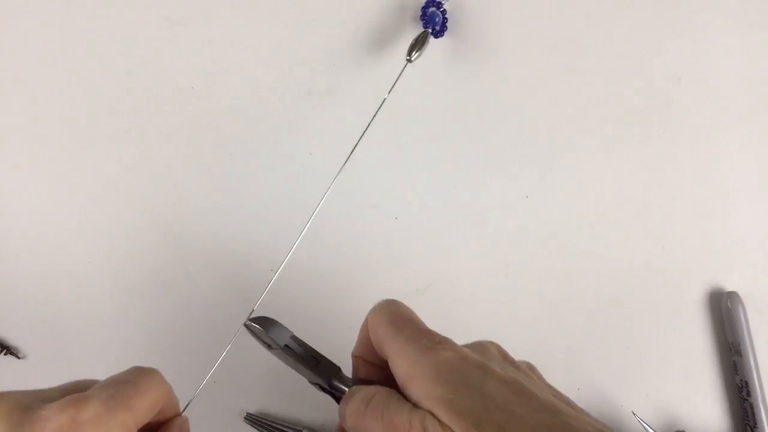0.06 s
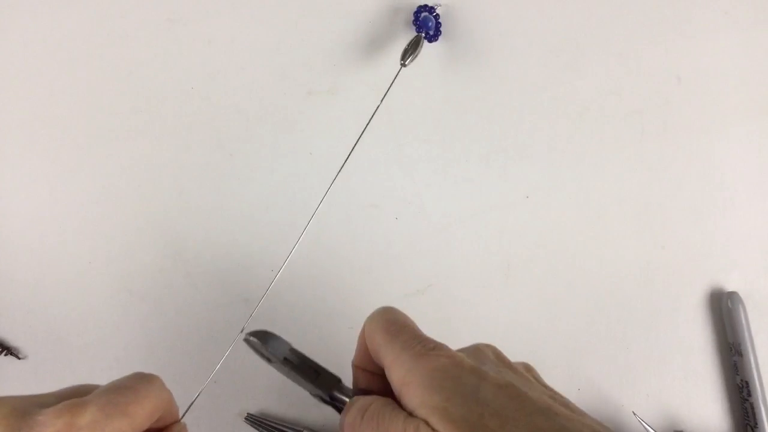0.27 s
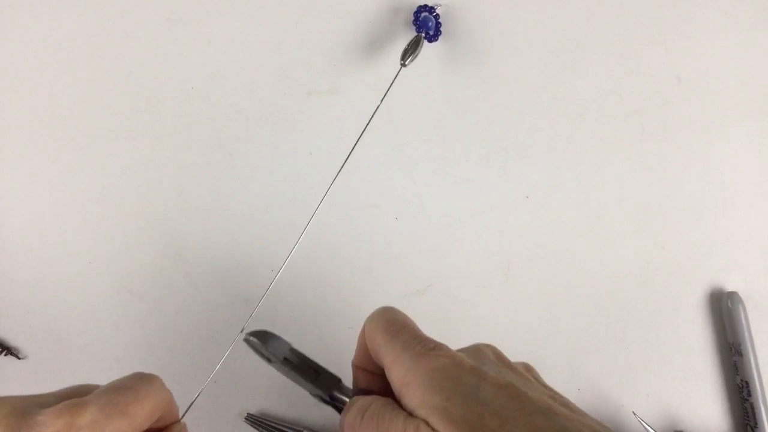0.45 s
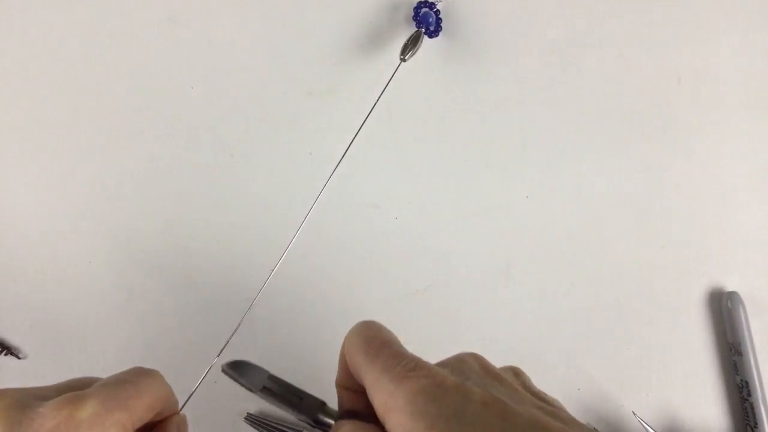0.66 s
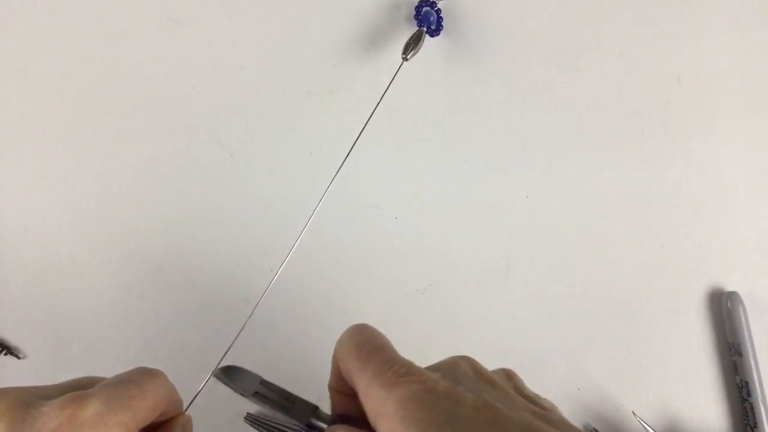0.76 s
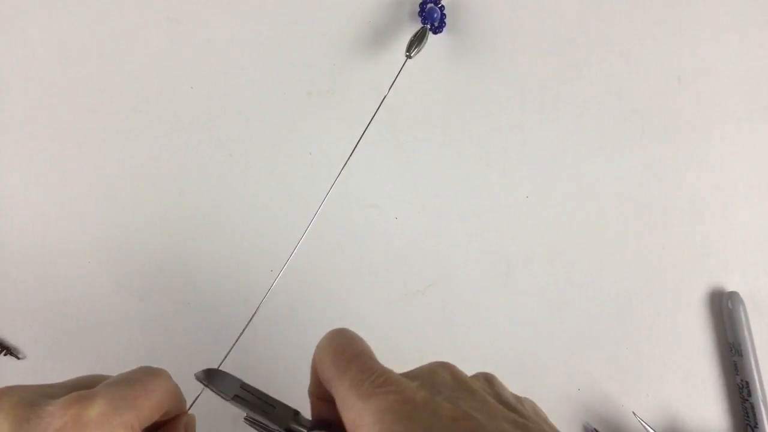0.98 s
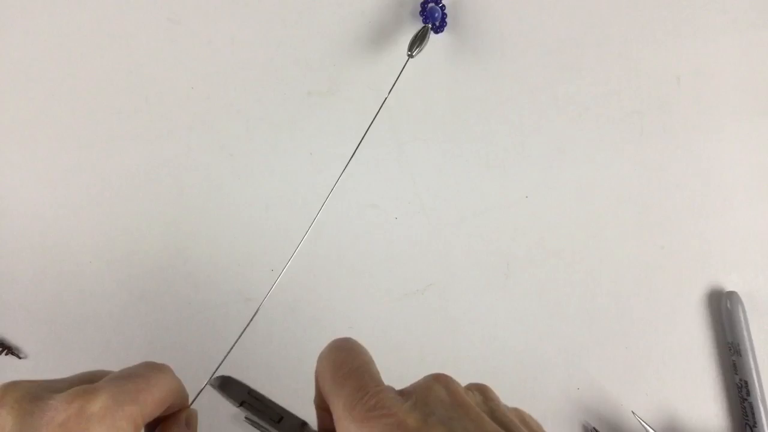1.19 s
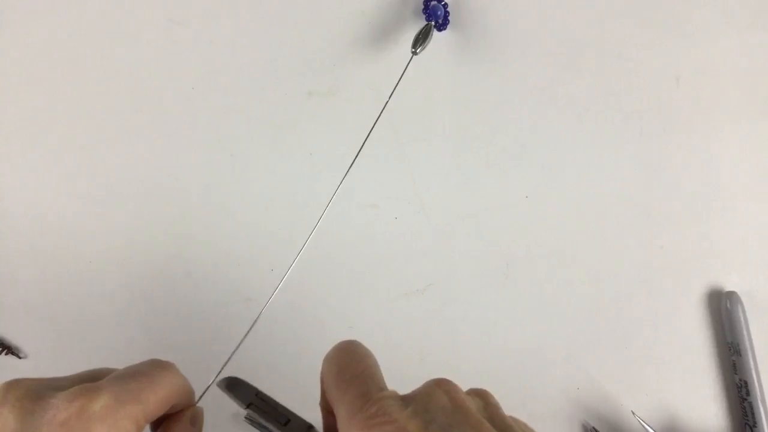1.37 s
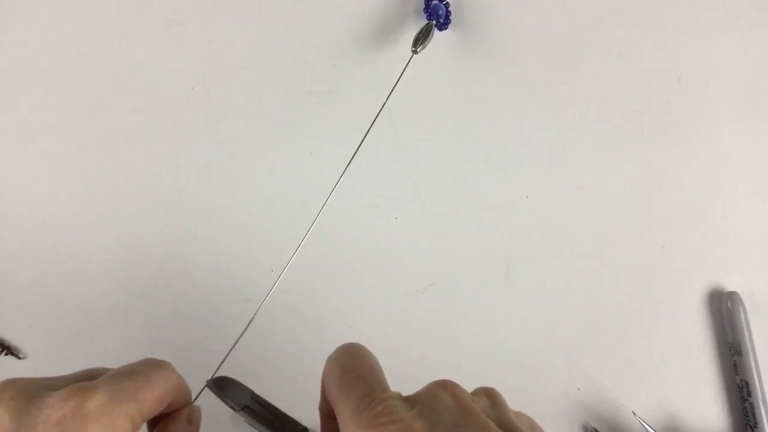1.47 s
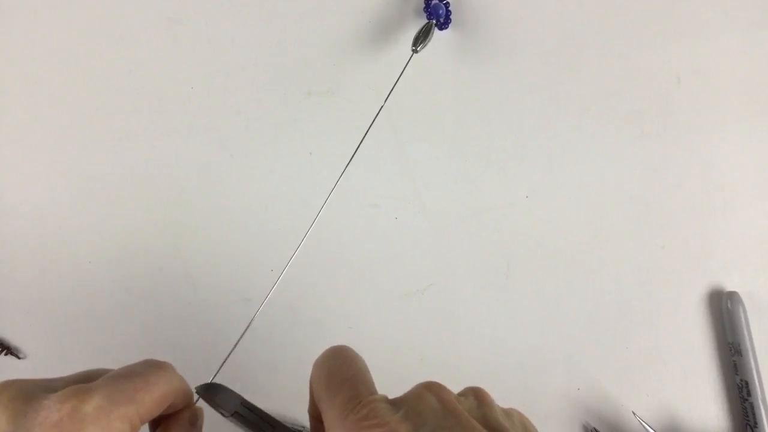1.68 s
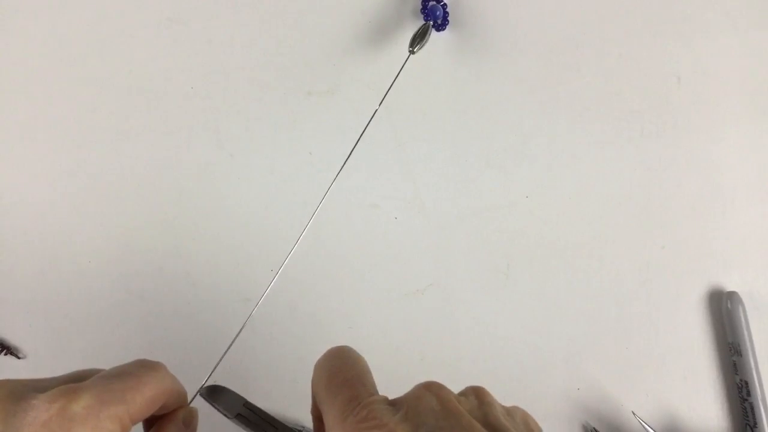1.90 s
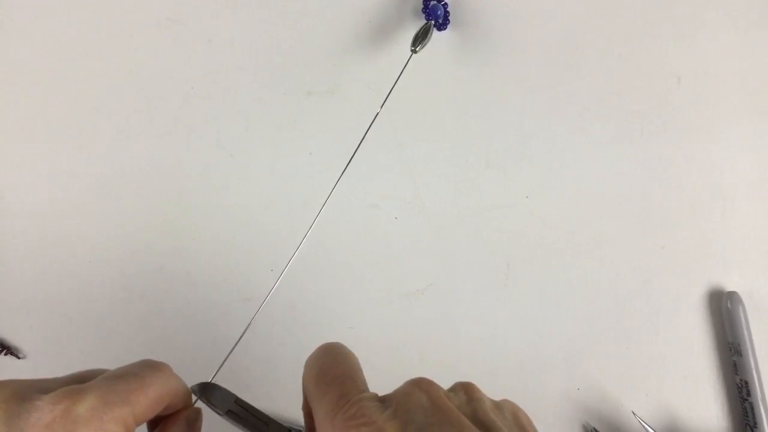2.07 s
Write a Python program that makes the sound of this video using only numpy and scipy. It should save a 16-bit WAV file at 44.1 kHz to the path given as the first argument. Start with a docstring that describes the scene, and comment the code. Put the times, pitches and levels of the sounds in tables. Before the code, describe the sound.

One hard, dry metallic snip of hand cutters on taut thin wire, heard close up indoors. Before it, soft hand rubbing, tiny touches and ticks; after it, a quick echo, rattling steel and a thin high scrape.

```python
"""A low ventilation hum and a soft rub of hands, then faint knocks with thin pings as jaws find a wire.
Wire cutters tick, snip once through thin craft wire, close above a table in a quiet room; an echo
returns, cutters and loose wire clatter and the wire scrapes along the steel to the end. Hum: filtered
noise. Rub and scrape: dense random slips through filters. Knocks, ticks and that echo: filtered impulse
plus chatter. Pings and jaw ring: decaying sines. Room: near echoes and a decaying noise tail."""
import sys
import numpy as np
from scipy import signal
from scipy.fft import rfft, irfft
from scipy.io import wavfile
from scipy.ndimage import uniform_filter1d

SR = 44100
rng = np.random.default_rng(int(sys.argv[2]) if len(sys.argv) > 2 else 0)


def bounce(signal):
    """Save signal as a 16-bit WAV file at the path given by the first command-line argument."""
    frames = np.transpose(np.atleast_2d(signal))
    limited = np.clip(frames, -1, 1)
    pcm = np.round(limited * 32767).astype(np.int16)
    wavfile.write(sys.argv[1], SR, pcm)


N = 94374

# ventilation hum spectrum: f/Hz, relative density/dB
HUM_SPECTRUM = [(20, -18.5), (50, -34.5), (100, -28.5), (125, -16.5), (155, -2.5), (200, -4.5), (250, 5),
                (300, -4.5), (370, -12), (480, -22.5), (800, -25.5), (1100, -30.5), (1450, -25),
                (1800, -49), (2400, -57), (4000, -61), (16000, -69)]
HUM_RMS_DB, HUM_DRIFT_STD_DB = -52, 3.5

# hands rubbing on tool and wire: t/s, level/dB
RUB_LEVEL = [(0, -62), (.15, -61.5), (0.398, -67.5), (.7, -79), (1.3, -72.5), (1.42, -75.5), (1.548, -72.5),
             (1.798, -81.5), (1.919, -62), (2.0, -58), (2.14, -59.5)]
# colour of the rub: f/Hz, relative level/dB
RUB_SPECTRUM = [(60, -28), (250, 4.5), (420, 13), (700, 1.5), (1200, -2), (1600, -6), (2200, -40),
                (4000, -63), (16000, -32)]

# jaws touch the taut wire, ping pitch set by where it is touched:
# t/s, knock level/dB, knock length/s, ping f/Hz, ping level/dB, ping t60/s
WIRE_TOUCHES = [(0.348, -40, 0.0055, 11700, -40.5, 0.00071), (0.82, -34, 0.013, 5110, -47.5, 0.0057),
                (0.9, -41, 0.012, 1820, -56, .01), (1.078, -32.5, 0.007, 3890, -46, 0.011),
                (1.094, -34, 0.006, 4110, -43.5, 0.028), (1.138, -32.5, 0.014, 3970, -48.5, 0.016),
                (1.143, -72, 0.011, 15100, -53, 0.0019), (1.423, -49, .003, 13400, -52.5, 0.0027),
                (1.521, -51, .008, 1650, -42, 0.014)]
# colour of the knock: f/Hz, relative level/dB
KNOCK_SPECTRUM = [(100, -37.5), (900, -13), (1600, 13), (2100, 1.5), (2700, -38), (3300, -19), (3700, -24),
                  (5200, -36), (8000, -33), (15500, -48)]
# close modes of the wire: frequency/ping pitch, relative level/dB
WIRE_MODES = [(0.99, 4.5), (0.82, -6), (1.3, -19)]
PING_RISE_S = 0.0013  # time constant

# steel clicks as the jaws seat; the snip's echo off a wall or ceiling (1.6142), and clatter after the cut:
# t/s, level/dB, treble shelf/dB, chatter length/s
STEEL_TICKS = [(1.2693, -30.5, -11, 0.006), (1.28, -25.5, -1.5, 0.0088), (1.311, -23.5, -19, 0.005),
               (1.334, -36.5, -14, 0.0038), (1.6142, -13, -4, 0.0012), (1.6177, -14.5, 13.5, 0.0047),
               (1.629, -20.5, 3, 0.0019), (1.6474, -27.5, 12, 0.0051), (1.665, -18, -28, 0.0017),
               (1.667, -16.5, 31, 0.0061), (1.674, -17.5, -16, 0.001), (1.693, -19.5, 7, 0.0015),
               (1.745, -33, -22, 0.0015), (1.8171, -25, 10, 0.0038), (1.825, -15.5, 10, .003),
               (1.8389, -13.5, 1, .0007), (1.845, -14.5, 5, 0.01), (1.8544, -21, -15, 0.00065),
               (1.9129, -14, -3.5, 0.0018), (1.9212, -10, -10, 0.0012), (1.937, 0.5, 15, 0.0066),
               (1.944, -4, 0, 0.00037), (1.946, -6.5, 0, 0.0049), (1.956, -19.5, 24, .004),
               (1.969, -20.5, 11, 0.0027), (2.0288, -5.5, 10, 0.0068), (2.037, -15, 12, 0.0018),
               (2.042, -16.5, -32, 0.0065), (2.06, -24.5, 32, 0.0097), (2.090, -9.5, 10, 0.0066),
               (2.093, -19.5, 13, 0.0062), (2.1375, -14, -2, 0.0022)]
# colour of a steel contact: f/Hz, relative level/dB
CONTACT_SPECTRUM = [(100, -29.5), (350, -21.5), (900, -16), (1300, -3.5), (1650, 5.5), (2050, 4),
                    (2600, -6.5), (4200, -10), (5200, -16), (8500, -20), (11000, -26.5), (14000, -25),
                    (15500, -25)]
TREBLE_SHELF_HZ = 4600
CHATTER_DB = 3  # against the first impulse, for a 1 ms chatter length
GRAIN_STD_DB, GRAINS_PER_S = 0.5, 3000

# jaw modes: f/Hz, relative level/dB, t60/s
JAW_MODES = [(417, -20.5, 0.0072), (1250, -21, 0.028), (1613, -8.5, 0.013), (2062, 2.5, .008),
             (3210, -21, 0.023), (3540, -20, 0.0097), (5060, -4, 0.0063), (6180, -10, 0.0046),
             (8470, -25, 0.021)]
FRACTURE_T_S, CRACK_DB, CRACK_LENGTH_S, CRACK_TREBLE_DB = 1.5948, -5, 0.0014, 19
SLAM_DELAY_S, SLAM_DB, SLAM_RISE_S = 0.00031, 5, 0.00039  # delay after the fracture

# steel and table ringing on after ticks and snip: f/Hz, relative level/dB, t60/s
RING_MODES = [(1188, -8, .09), (1333, -8, .09), (1465, -9, .13), (1605, -2, .13), (1805, -2, .09),
              (1998, -5, .07), (2092, -6, .12), (2573, -6, .1), (2924, -1, .09), (3374, 0, .08),
              (3660, 1, .07), (4542, 2, .07), (5520, -1, .06), (6480, 0, .04), (8480, 4, .04)]
RING_DB = -23.5

# wire sliding on steel: t/s, level/dB
SCRAPE_LEVEL = [(2.085, -57), (2.096, -51.5), (2.104, -45), (2.113, -39.5), (2.123, -42.5), (2.13, -40),
                (2.14, -36.5)]
# resonances of the scraped wire: f/Hz, width/Hz, relative level/dB
SCRAPE_RESONANCES = [(6600, 150, -2), (6820, 170, 7), (7460, 89, -16), (8660, 310, -8), (9780, 150, -8),
                     (10800, 330, -16)]
# broad hiss under those resonances: f/Hz, relative level/dB
SCRAPE_HISS_SPECTRUM = [(500, -29), (2000, -3), (3800, -17), (6000, -7), (9000, -6), (12000, -17),
                        (15500, -27)]

# reflections from nearby surfaces: delay/s, level/dB
NEAR_ECHOES = [(.0039, -17.5), (.0052, -17.5), (.0083, -17.5)]
# room tail decay: f/Hz, t60/s
ROOM_T60 = [(300, 0.98), (1700, 0.27), (5000, 0.29), (10000, 0.28), (16000, 0.25)]
ROOM_TAIL_DB = -14.5

LOW_CUT_HZ, BAND_EDGE_HZ = 89, 15780


def amp(db):
    """Decibels to amplitude gain."""
    return 10 ** (np.asarray(db) / 20)


def unit(x):
    """Scales to energy 1."""
    return x / np.sqrt(np.sum(x ** 2) + 1e-20)


def unit_rms(x):
    """Scales an N-sample signal to RMS 1."""
    return np.sqrt(N) * unit(x)


def read_spectrum(points, hz):
    """Interpolates a table on a log-frequency axis."""
    f, value = np.transpose(points)
    return np.interp(np.log(hz + 1), np.log(f + 1), value)


def add(mix, t_s, sound):
    """Mixes a sound in at t_s, cut off at the end of the mix."""
    part = mix[round(t_s * SR):][:len(sound)]
    part += sound[:len(part)]


def minimum_phase(db, size=2048):
    """Impulse response with these levels and its energy as early as possible."""
    mirrored_log_gain = np.r_[db, db[-2:0:-1]] * np.log(10) / 20
    phase = -signal.hilbert(mirrored_log_gain).imag[:len(db)]
    return irfft(amp(db) * np.exp(1j * phase))[:size]


def modes(table, size=8192):
    """Struck body: a sum of exponentially decaying sines."""
    t = np.arange(size) / SR
    out = np.zeros(size)
    for hz, db, t60 in table:
        decay = np.exp(-np.log(1000) * t / t60)
        out += amp(db) * decay * np.sin(2 * np.pi * hz * t)
    return out


def grains(count):
    """Tiny slips: impulses of random sign and uneven size at random moments."""
    sign = rng.choice([-1., 1.], count)
    size = amp(GRAIN_STD_DB * rng.standard_normal(count))
    present = rng.random(count) < GRAINS_PER_S / SR
    return sign * size * present


def chatter(length_s, size):
    """Slips shrinking under a half-Gaussian of sigma length_s."""
    t = np.arange(size) / SR
    return grains(size) * np.exp(-(t / length_s) ** 2 / 2)


def hum():
    """Steady low air noise whose level drifts in time-frequency patches."""
    hz, _, z = signal.stft(rng.standard_normal(N), SR, nperseg=4096, noverlap=3072)
    drift = uniform_filter1d(rng.standard_normal(z.shape), size=6, axis=0)
    drift = uniform_filter1d(drift, size=5, axis=1)
    level_db = read_spectrum(HUM_SPECTRUM, hz)[:, None] + HUM_DRIFT_STD_DB * drift / drift.std()
    noise = signal.istft(z * amp(level_db), nperseg=4096, noverlap=3072)[1][:N]
    return amp(HUM_RMS_DB) * unit_rms(noise)


def rub():
    """Skin slides softly on the handles: dense, dull slips."""
    level = amp(np.interp(np.arange(N) / SR, *np.transpose(RUB_LEVEL)))
    colour = amp(read_spectrum(RUB_SPECTRUM, np.fft.rfftfreq(N, 1 / SR)))
    return level * unit_rms(irfft(rfft(grains(N)) * colour, N))


def wire_ping(ping_hz, t60_s, size):
    """Close wire modes around one pitch, decaying together after a soft onset."""
    t = np.arange(size) / SR
    table = [(ping_hz * share, db, t60_s) for share, db in WIRE_MODES]
    return modes(table, size=size) * (1 - np.exp(-t / PING_RISE_S))


def touches():
    """Jaws on wire: one push drives both a soft dull knock and a thin ping."""
    out, size = np.zeros(N), 4096
    knock = minimum_phase(read_spectrum(KNOCK_SPECTRUM, np.fft.rfftfreq(size, 1 / SR)))
    for t_s, knock_db, length_s, ping_hz, ping_db, ping_t60_s in WIRE_TOUCHES:
        push = chatter(length_s, size)
        push[0] += 1
        ping = wire_ping(ping_hz, ping_t60_s, size)
        add(out, t_s, amp(knock_db) * unit(signal.fftconvolve(push, knock)))
        add(out, t_s, amp(ping_db) * unit(signal.fftconvolve(push, ping)))
    return out


def contact(treble_db, length_s, size=4096):
    """Steel contact: a sharp touch and its dying chatter, coloured by the tool."""
    hz = np.fft.rfftfreq(size, 1 / SR)
    push = amp(CHATTER_DB) * np.sqrt(length_s * 1000) * unit(chatter(length_s, size))
    push[0] += 1
    shelf_db = treble_db * hz ** 2 / (hz ** 2 + TREBLE_SHELF_HZ ** 2)
    colour_db = read_spectrum(CONTACT_SPECTRUM, hz) + shelf_db
    return unit(signal.fftconvolve(push, minimum_phase(colour_db)))


def ticks():
    """Light steel ticks before the cut; the snip's echo, made like a contact, and clatter after it."""
    out = np.zeros(N)
    for t_s, db, treble_db, length_s in STEEL_TICKS:
        add(out, t_s, amp(db) * contact(treble_db, length_s))
    return out


def jaw_ring(size=8192):
    """Neighbouring modes of the jaws swing in opposite directions."""
    return modes(JAW_MODES[::2], size=size) - modes(JAW_MODES[1::2], size=size)


def snip():
    """The wire fractures with a crack, then the jaws slam together and ring."""
    out, ring = np.zeros(N), jaw_ring()
    rise = np.minimum(np.arange(len(ring)) / SR / SLAM_RISE_S, 1)
    add(out, FRACTURE_T_S, amp(CRACK_DB) * contact(CRACK_TREBLE_DB, CRACK_LENGTH_S))
    add(out, FRACTURE_T_S + SLAM_DELAY_S, amp(SLAM_DB) * unit(ring * rise))
    return out


def ring_on(hits):
    """Steel and table modes excited by the hits."""
    return amp(RING_DB) * signal.fftconvolve(hits, unit(modes(RING_MODES)))[:N]


def scrape():
    """Dense slips excite high resonances as the wire slides."""
    hz, t = np.fft.rfftfreq(N, 1 / SR), np.arange(N) / SR
    body = amp(read_spectrum(SCRAPE_HISS_SPECTRUM, hz)).astype(complex)
    for f, width_hz, db in SCRAPE_RESONANCES:
        body += amp(db) / (1 + 2j * (hz - f) / width_hz)
    sliding = t > SCRAPE_LEVEL[0][0]
    level = amp(np.interp(t, *np.transpose(SCRAPE_LEVEL))) * sliding
    return level * unit_rms(irfft(rfft(grains(N)) * body, N))


def room(x):
    """Near reflections and a half-second noise tail whose bass dies last."""
    hz, t, z = signal.stft(rng.standard_normal(SR // 2), SR, nperseg=256)
    decay = np.exp(-np.log(1000) * t / read_spectrum(ROOM_T60, hz)[:, None])
    tail = signal.istft(z * decay, nperseg=256)[1]
    response = np.zeros(SR)
    response[0] = 1  # direct sound
    add(response, NEAR_ECHOES[0][0], amp(ROOM_TAIL_DB) * unit(tail))
    for delay_s, db in NEAR_ECHOES:
        add(response, delay_s, amp([db]))
    return signal.fftconvolve(x, response)[:N]


def scene():
    """Touches, ticks, snip and scrape in the room; rub and hum added without it."""
    hits = ticks() + snip()
    in_room = touches() + hits + ring_on(hits) + scrape()
    return (hum() + rub() + room(in_room))[None]


def record(dry):
    """The recorder's bass cut and band limit."""
    low_cut = signal.butter(2, LOW_CUT_HZ, "high", fs=SR, output="sos")
    band_limit = signal.firwin(511, BAND_EDGE_HZ, window=("kaiser", 9), fs=SR)
    return signal.oaconvolve(signal.sosfilt(low_cut, dry), band_limit[None], "same")


dry = scene()
out = record(dry)
bounce(out)
```